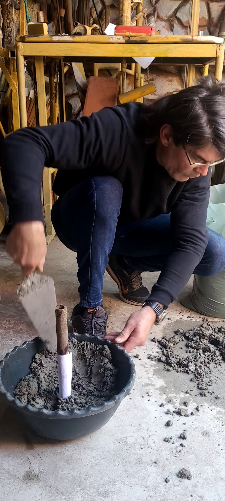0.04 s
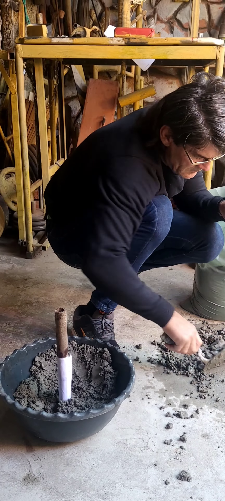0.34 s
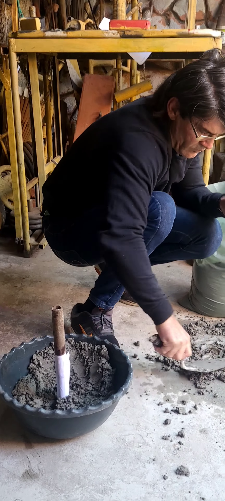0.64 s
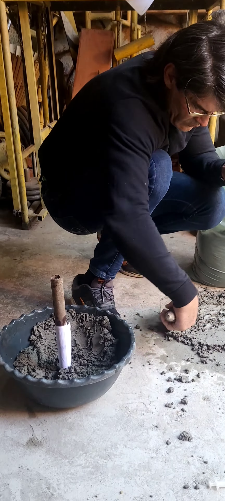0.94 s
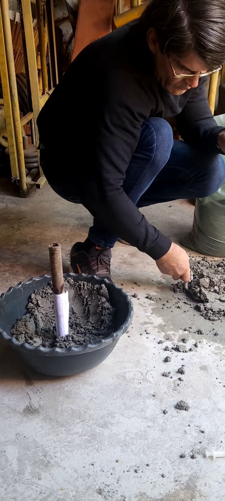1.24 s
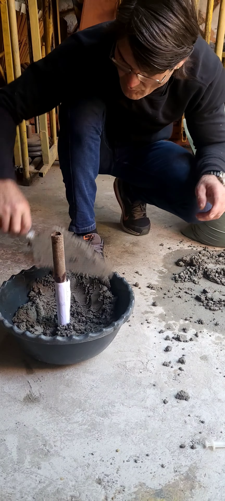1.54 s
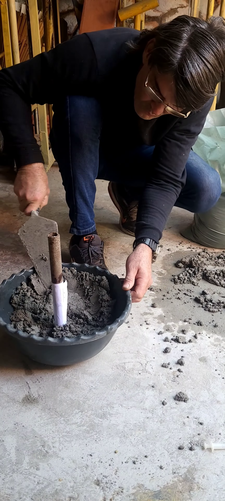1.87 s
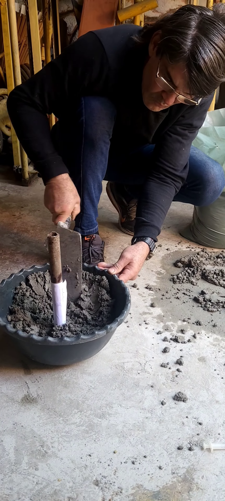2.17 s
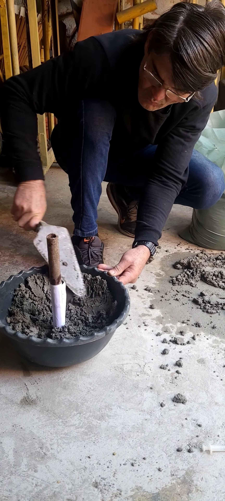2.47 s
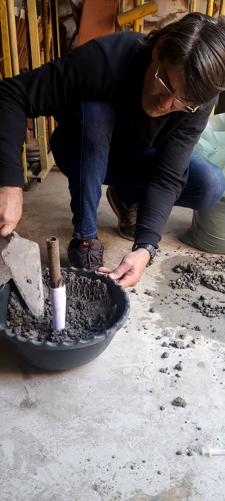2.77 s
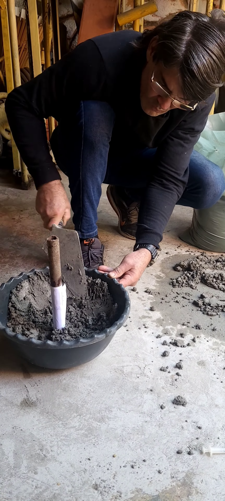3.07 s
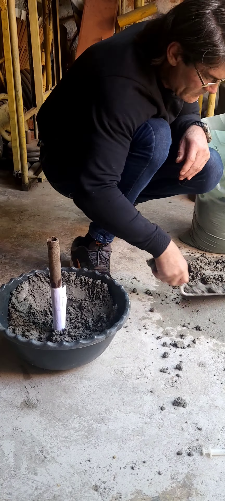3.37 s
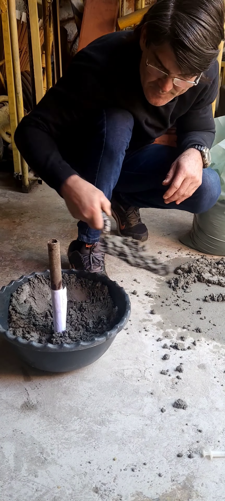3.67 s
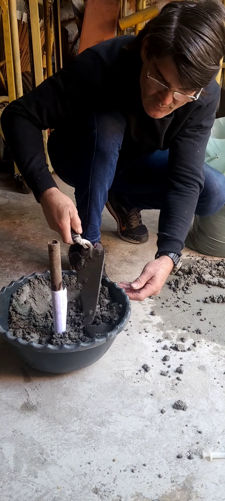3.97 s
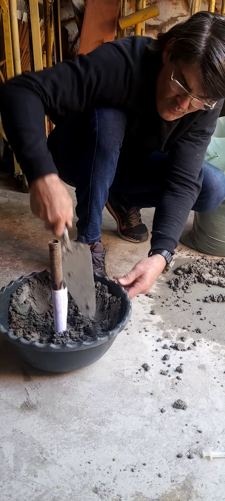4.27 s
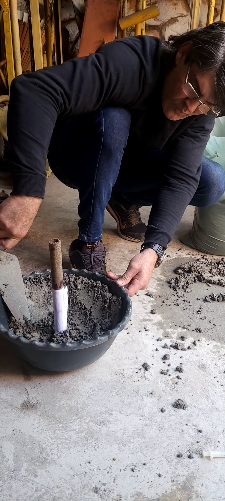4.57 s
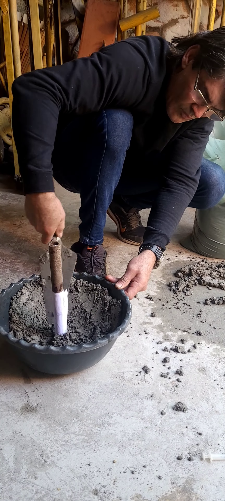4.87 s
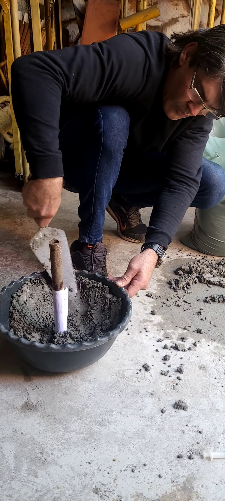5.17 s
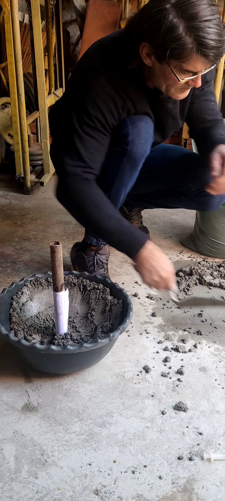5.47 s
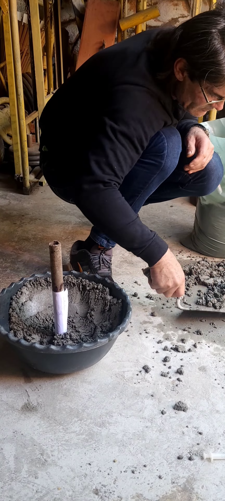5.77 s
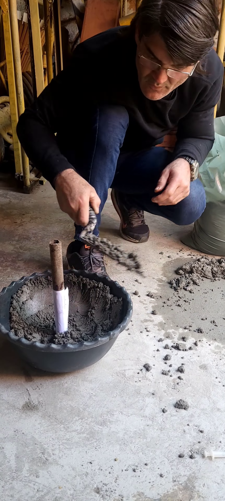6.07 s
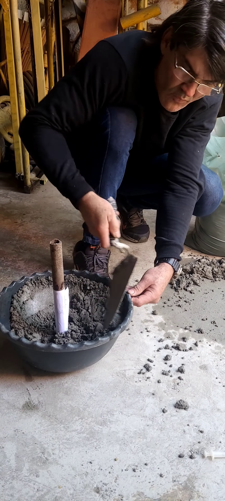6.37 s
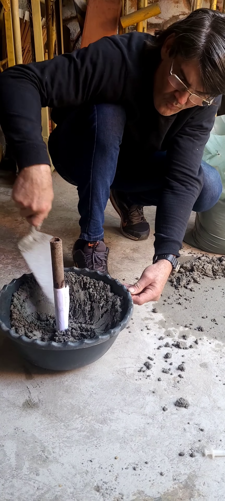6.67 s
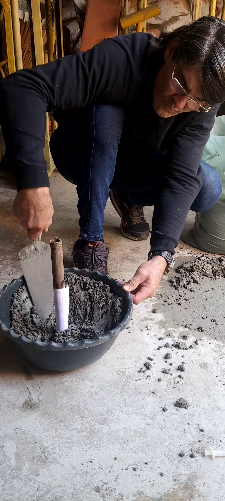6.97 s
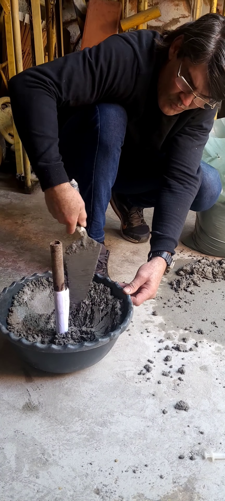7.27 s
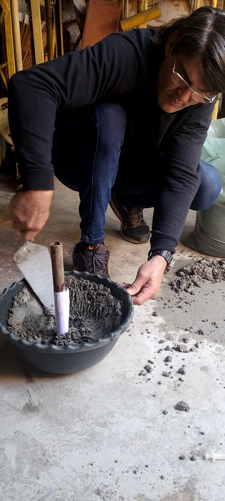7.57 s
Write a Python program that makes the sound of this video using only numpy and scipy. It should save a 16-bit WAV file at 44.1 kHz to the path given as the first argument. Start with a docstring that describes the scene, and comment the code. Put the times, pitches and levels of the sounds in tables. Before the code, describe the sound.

Heard up close in a garage with a low rumble and almost no echo, a metal trowel gathers gritty mortar from the floor. Three short, loud scoops rasp and make the blade ring, the later two with bright clinks. After each one, the trowel smooths and presses the wet mix into a plastic basin with a quiet sandy hiss, crunches and dull taps. A final sharp dig ends it.

```python
"""Garage workshop, a stereo pair close to a steel trowel working wet mortar over a low room rumble.
First the edge rakes the concrete floor: sand grinds under the blade and makes it ring and judder.
A scoop follows at 1.1 s, then the load is packed into a plastic basin: a soft hiss, with dull grinds
and knocks where the tip reaches the plastic. Scooping and packing come round again at 3.2 and 5.7 s.
A faint drone joins near 7 s, and the blade digs into the basin once more at 7.6 s."""
import sys
import numpy as np
from scipy import signal
from scipy.fft import rfft, irfft, next_fast_len
from scipy.io import wavfile
from scipy.ndimage import map_coordinates

SR = 44100
rng = np.random.default_rng(int(sys.argv[2]) if len(sys.argv) > 2 else 0)


def persist_wave(psi):
    """Save psi, clipped to +-1, as 16-bit WAV."""
    counts = np.round(np.clip(psi, -1, 1) * 32767).astype(np.int16)
    wavfile.write(sys.argv[1], SR, np.atleast_2d(counts).T)


N = 340893
TIME = np.arange(N) / SR
BINS = np.fft.rfftfreq(4096, 1 / SR)

# Two spots as the microphones hear them: f/Hz, likeness/0-1, left minus right/dB, left phase lead/rad
AT_TIP = [(60, .97, -5, 0), (250, .96, -1.5, 0), (1000, .66, -3.5, -.28), (2490, .25, -2.5, -.57),
          (4340, .1, -5.3, -.6), (8250, .15, -11.5, -.5), (12000, .6, -10, -.6), (15500, .1, -3.5, -.6)]
AT_BASIN = [(60, 1, -4.5, -.24), (300, .86, -3.5, -.28), (1400, .28, -3, -.36), (2700, .3, -3.5, -.8),
            (4500, .19, -5, -1.2), (8500, .05, -9, -.93), (11000, .05, -12, -1.5), (15500, .05, -6, -1.1)]

# Spectra: f/Hz, relative level/dB
ROOM_AIR = [(30, -25), (110, -5), (170, -3), (250, 0), (410, 1), (500, -9), (800, -15), (1200, -19),
            (2500, -31), (5000, -31), (7300, -32), (8500, -39), (16000, -42)]
ROOM_RUMBLE = [(20, -28), (35, -20), (60, 8.5), (100, -8), (160, -15.5), (400, -37)]
WET_SAND = [(300, -12), (1100, -8), (2800, -6), (3400, -1.5), (4400, 4), (5800, 0), (7100, 3.5),
            (8000, -4.5), (9000, -5), (10800, 1.5), (13000, -0.5), (16000, -4.5)]
COARSE_GRIT = [(700, -15), (2100, -3.5), (3100, -5), (4300, 1), (5900, -1), (7000, 1), (7900, -6.5),
               (9000, -9), (10600, -2.5), (13000, -4.5), (16000, -12)]
HEAP_DRAG = [(20, -36.5), (100, -13.5), (170, -1.5), (255, 4), (340, -3.5), (480, -3.5), (590, 7), (700, 4),
             (860, -1), (1200, -4.5), (2500, -33.5)]
BASIN_WALL = [(90, -23), (270, -7), (400, 0), (560, 2.5), (1000, 1.5), (1400, 2.5), (2300, -5.5),
              (4500, -8.5), (7000, -9), (9000, -36), (16000, -44)]
FALLING_LUMP = [(25, -21.5), (60, -13), (180, -10.5), (350, -18.5), (900, -36), (3000, -78)]

# Blade modes: f/Hz, width/Hz, relative level/dB
BEDDED_BLADE = [(550, 88, -2.5), (1360, 136, -1), (1535, 120, 1.5), (1912, 57, 7), (2033, 27, -3),
                (2508, 86, 0), (3320, 61, 0), (4140, 63, -2)]  # sunk in mortar
FLAT_BLADE = [(975, 100, -7.5), (1197, 18, 1), (1360, 60, -4.5), (1440, 60, -7.5), (1462, 44, -3),
              (1723, 130, -3.5), (1886, 52, 0), (2390, 53, -10), (2580, 30, -6.5), (2870, 26, -14.5),
              (3320, 84, -6.5), (4340, 58, -5)]  # pressed flat
BLADE_ON_EDGE = [(860, 32, -1.5), (1270, 210, 2), (1370, 110, -5.5), (1470, 45, -0.5), (1700, 71, -4),
                 (1875, 56, 2.5), (2040, 120, -6.5), (2490, 63, 4), (2540, 63, -5), (3537, 55, 3.5),
                 (4550, 55, -11), (4830, 75, -1), (5700, 92, -11)]
FREE_BLADE = [(1525, 30, 0), (1945, 35, -1), (2490, 35, -8), (3550, 40, -12), (4020, 45, -11),
              (4330, 45, -11), (4880, 45, -12)]

# Cue sheets; the levels are trimmed on their way to the microphones.
# Course of the rumble: t/s, level/dB
RUMBLE_LEVEL = [(0, -56.5), (1.03, -71), (1.25, -61.5), (1.75, -67), (3, -67.5), (4.9, -71), (6.15, -67),
                (6.45, -63), (7.73, -59.5)]
# Smoothing strokes in the basin: t/s, length/s, hiss/dB, swell/dB, ring/dB
STROKES = [(0.0, 0.032, -51.5, -20, -56), (1.428, 0.14, -58.5, 20, -65), (1.722, 0.086, -54, 5, -65.0),
           (1.824, 0.043, -51.5, -6, -61.0), (1.886, 0.097, -52.5, 3.5, -57),
           (2.054, 0.094, -57.5, -2, -63.5), (2.155, 0.051, -44.0, -2.0, -53.5),
           (2.273, 0.16, -53, 4.5, -56.5), (2.434, 0.125, -59, 5.5, -63), (2.555, 0.07, -48, -4, -53),
           (2.634, 0.04, -50.5, 5.5, -52), (2.736, 0.073, -58, 13.5, -66), (2.863, 0.047, -52, 6, -62),
           (2.946, 0.17, -52.5, -6.0, -60), (3.732, 0.15, -57, -14.5, -61.5),
           (3.964, 0.242, -49, -0.5, -54.5), (4.273, 0.11, -54, -1, -57), (4.382, 0.11, -52, 15, -60.5),
           (4.485, 0.29, -50.5, 1, -58.0), (4.833, 0.14, -50.5, 1.5, -60.5),
           (5.049, 0.082, -54.5, -3.5, -65), (5.139, 0.15, -47.5, 8, -62.5), (5.983, 0.18, -60, 6, -72),
           (6.172, 0.03, -47.5, -0.5, -48), (6.299, 0.13, -48, 6.5, -52), (6.449, 0.19, -48, 0.5, -55),
           (6.679, 0.2, -55, -1, -61), (6.896, 0.25, -52.5, 14.5, -57), (7.167, 0.18, -47.5, -2.5, -55.5),
           (7.406, 0.24, -48.0, 3.5, -52.5)]
# Sharp steel clinks as the edge or tip makes contact, on the floor or in the basin: t/s, peak/dB
CLINKS = [(0.075, -43.5), (0.838, -29.5), (3.31, -16), (3.352, -17), (5.498, -23), (5.7285, -11.5),
          (5.736, -12.5), (5.7991, -15), (6.309, -38.5), (7.104, -25.5), (7.415, -35.5), (7.627, -23)]
# Pushes of the blade through gritty mortar, on the floor and in a last dig in the basin at 7.6 s:
# t/s, length/s, run-out t60/s, hiss/dB, swell/dB, ring/dB, drag/dB
RAKES = [(0.118, 0.022, 0.14, -46, 2.5, -44.5, -47), (0.19, 0.12, 0.092, -36.5, 5, -41.5, -44),
         (0.423, 0.042, 0.24, -50.5, 4.5, -55.0, -62.5), (0.497, 0.081, 0.2, -46.5, 8.5, -54, -61),
         (0.604, 0.015, 0.12, -40.5, 4, -45, -57), (0.653, 0.032, 0.134, -45.5, 2, -57, -63),
         (0.697, 0.07, 0.045, -43, -8.5, -53.5, -77), (0.833, 0.057, 0.042, -35, 1.5, -41, -42.5),
         (0.894, 0.025, 0.12, -39.5, -0.5, -54, -52.5), (5.477, 0.2, 0.073, -37.5, 8, -45, -48)]  # the edge gathers loose mortar
SCOOPS = [(1.092, 0.026, 0.082, -44, -1, -42.5, -53.5), (1.128, 0.087, 0.1, -29, 9, -29.5, -43),
          (3.249, 0.067, 0.085, -41.5, 9.5, -46, -41), (3.305, 0.067, 0.12, -30.5, 5, -28, -42.5),
          (3.394, 0.04, 0.067, -30, -8.5, -30.5, -39), (3.463, 0.016, 0.054, -42.5, 1, -59, -76),
          (5.738, .022, 0.029, -39, 4, -35, -52), (5.759, 0.023, .04, -26, 1.5, -25, -46),
          (5.784, 0.043, 0.064, -23.5, -2, -33.5, -38.5), (7.597, 0.019, 0.063, -33.5, 0, -44, -55),
          (7.62, 0.018, 0.048, -27.5, 2, -36, -46)]  # the blade is shoved into it
# The loaded blade judders, pitched by the point of contact: t/s, length/s, f/Hz, level/dB
JUDDERS = [(.225, .08, 830, -45), (.52, 0.09, 1160, -51.5), (1.152, 0.094, 1104, -32.5),
           (3.325, 0.13, 1177, -35), (5.76, 0.028, 1385, -27.5), (6.457, 0.07, 1420, -51.5),
           (6.833, 0.026, 3480, -48), (7.625, 0.023, 520, -40), (7.619, 0.03, 928, -41)]
# Dull knocks of the trowel: t/s, peak/dB, f/Hz
KNOCKS = [(1.129, -23, 695), (2.5824, -35, 890), (3.82, -43, 1120), (5.497, -28, 1110), (6.3915, -33, 810),
          (6.5168, -16, 1030), (6.522, -27, 900), (6.5392, -16.5, 1290), (6.866, -38, 930),
          (7.101, -25, 1400), (7.128, -26, 1180), (7.266, -39.5, 613)]
# Brief sounds: t/s, length/s, level/dB
TIP_TOUCHES = [(.836, 0.053, -38), (2.79, 0.022, -52.5), (2.872, 0.034, -57), (2.96, .04, -63),
               (3.085, 0.016, -52.5), (3.251, 0.066, -39), (3.306, 0.02, -38.5), (5.484, 0.048, -51),
               (5.729, 0.028, -38), (7.42, 0.06, -50), (7.622, 0.018, -33.5)]  # only the tip touches, so the blade sings
RUSTLES = [(.96, 0.07, -64.5), (1.305, 0.081, -75.5), (1.61, 0.11, -69), (2, 0.042, -61.5),
           (3.16, 0.078, -64), (3.52, .2, -79.5), (5.34, 0.27, -70), (5.89, 0.15, -74), (6.23, .06, -67.5)]  # sleeves, and crumbs sliding on the lifted blade
BUMPS = [(1.51, 0.05, -55), (2.32, 0.066, -53.5), (3.8, 0.053, -61), (5, 0.069, -60), (6.49, .04, -52),
         (6.69, 0.037, -48)]  # the basin shifts on the floor
PLOPS = [(1.53, 0.045, -60), (2.581, 0.015, -53), (3.81, .068, -52.5), (6.39, .06, -58), (6.51, .03, -51),
         (6.72, 0.042, -57), (6.85, .056, -62)]  # mortar falls
CRUNCHES = [(1.535, 0.053, -52.5), (1.655, 0.024, -61), (1.793, 0.024, -52.5), (2.335, 0.064, -55.5),
            (2.58, 0.025, -39), (2.653, 0.021, -46.5), (3.607, 0.0081, -56), (3.68, 0.04, -61),
            (3.812, 0.035, -52), (3.947, 0.045, -58.5), (3.975, 0.028, -43.5), (4.026, 0.014, -42.5),
            (4.488, 0.022, -44.5), (4.536, 0.032, -43.5), (4.603, 0.022, -43), (5.28, 0.027, -43),
            (6.181, 0.025, -38.5), (6.326, 0.083, -43), (6.518, 0.029, -34), (6.72, 0.011, -51.5),
            (6.843, 0.044, -50), (7.064, 0.059, -45), (7.26, 0.026, -57)]  # the tip grinds against the basin
PRESSES = [(1.557, 0.011, -44), (1.954, 0.015, -42), (2.329, 0.017, -40.5), (4.531, 0.013, -43),
           (5.221, 0.02, -43), (6.362, 0.017, -41), (6.414, .016, -41), (6.508, 0.032, -41),
           (6.828, 0.025, -39), (6.945, 0.021, -40.5), (7.096, 0.01, -37.5)]  # a harder press squeezes the wet sand


def amp(db):
    """Decibels to gain."""
    return 10 ** (np.asarray(db) / 20)


def unit_rms(x):
    """Scales to rms 1."""
    return x / np.sqrt(np.mean(x ** 2) + 1e-20)


def columns_at(table, hz=BINS):
    """Columns of a table, joined by straight lines over log frequency."""
    f, *columns = np.transpose(table)
    return [np.interp(np.log(hz + 1), np.log(f), c) for c in columns]


def shape(spectrum):
    """Gain of a spectrum table."""
    return amp(columns_at(spectrum)[0])


def resonances(modes):
    """Gain of a set of damped modes."""
    powers = (amp(2 * db) * (BINS * width) ** 2 / ((BINS ** 2 - hz ** 2) ** 2 + (BINS * width) ** 2)
              for hz, width, db in modes)
    return np.sqrt(sum(powers))


def colour(x, gain):
    """Minimum-phase filter: it rings after each grain, never before."""
    log_gain = np.log(np.maximum(np.r_[gain, gain[-2:0:-1]], 1e-5))
    taps = np.fft.ifft(np.exp(np.conj(signal.hilbert(log_gain)))).real
    return signal.oaconvolve(x, taps[None], axes=1)[:, :x.shape[1]]


def microphones(pair, place):
    """Turns two unrelated signals into left and right, alike in the bass and apart in the treble."""
    size = next_fast_len(pair.shape[1])
    right, unrelated = rfft(pair, size)
    likeness, lean_db, lead = columns_at(place, np.fft.rfftfreq(size, 1 / SR))
    likeness = np.clip(likeness, 0, 1)
    blend = likeness * right + np.sqrt(1 - likeness ** 2) * unrelated
    left = blend * np.exp(1j * lead) * amp(lean_db)
    return irfft(np.array([left, right]), size)[:, :pair.shape[1]]


def voiced(sizes, gain, place):
    """Each grain kicks a body one way or the other; rms 1 midway between the microphones."""
    kicks = sizes * rng.choice([-1, 1], (2, N))
    sound = colour(microphones(kicks, place), gain)
    return sound / np.std(sound.mean(0))


def wander(rate_hz):
    """Smooth random motion of rms 1."""
    return unit_rms(np.interp(TIME * rate_hz, np.arange(N), rng.standard_normal(N)))


def grains(per_s, spread_db, slip_hz, slip_db):
    """Sizes of the sand grains that crack under the steel, in clumps as the blade sticks and slips."""
    sizes = amp(spread_db * np.minimum(rng.exponential(1, N), 4))
    cracks = rng.random(N) < per_s / SR
    return sizes * cracks * amp(slip_db * wander(slip_hz))


def push(start, length, db, swell_db, attack_s, t60):
    """Gain of one push of the hand: the blade bites, the pressure swells or eases, the blade runs out."""
    gain = np.zeros(N)
    first = max(round(start * SR), 0)
    t = TIME[first:first + round((length + 2 * t60) * SR)] - start
    bite = np.clip(t / attack_s, 0, 1)
    held = amp(db + swell_db * (np.clip(t / length, 0, 1) - .5))
    run_out = amp(-60 * np.maximum(t - length, 0) / t60)
    gain[first:first + len(t)] = bite * held * run_out
    return gain


def bursts(cues, rise_s, fall_s):
    """Gain of brief sounds: a quick rise, a sagging hold, a quick fall, silence between."""
    gain = np.zeros(N)
    for start, length, db in cues:
        corners = start + np.array([0, rise_s, max(length - fall_s / 2, rise_s), length + fall_s])
        gain += amp(db) * np.interp(TIME, corners, [0, 1, .7, 0])
    return gain


def add(mix, start, sound):
    """Mixes a sound in at its start time."""
    part = mix[:, round(start * SR):][:, :sound.shape[-1]]
    part += sound[..., :part.shape[1]]


def sliding(x, patchy_db, patch_hz=240, patch_s=.035):
    """The contact moves along the blade, so its many high modes swell and fade in turn."""
    hz, t, spectra = signal.stft(x, SR, nperseg=512, noverlap=384)
    grid = np.meshgrid(hz / patch_hz, t / patch_s, indexing="ij")
    patches = unit_rms(map_coordinates(rng.standard_normal((128, 512)), grid, order=1, mode="wrap"))
    depth_db = patchy_db * np.interp(hz, [5000, 9000], [1, .55])  # the highest modes overlap and even out
    spectra *= amp(depth_db[:, None] * patches)
    moved = signal.istft(spectra, SR, nperseg=512, noverlap=384)[1][:, :N]
    return moved / np.std(moved.mean(0))


def room_tone(air_db=-63, waver_db=1, drone_hz=156, drone_db=-66, drone_start_s=6.85):
    """Steady workshop air and a restless rumble with the basin's bumps; a faint drone joins late."""
    steady = np.ones(N)
    air = amp(air_db) * voiced(steady, shape(ROOM_AIR), AT_BASIN)
    restless = amp(np.interp(TIME, *np.transpose(RUMBLE_LEVEL)) + waver_db * wander(rate_hz=11))
    bumps = bursts(BUMPS, rise_s=0.025, fall_s=.03)
    rumble = voiced(steady, shape(ROOM_RUMBLE), AT_BASIN) * np.hypot(restless, bumps)
    drone = voiced(steady, resonances([(drone_hz, 14, 0)]) ** 2, AT_BASIN)
    fade_in = np.clip((TIME - drone_start_s) / 0.14, 0, 1)
    return air + rumble + amp(drone_db) * drone * fade_in


def smoothing(hiss_trim_db=-0.44, ring_trim_db=-1.5, lift_t60=0.066):
    """In the basin the blade hisses over wet sand, its ring damped by mortar; sleeves rustle between."""
    hiss, ring = np.zeros((2, N))
    for start, length, hiss_db, swell_db, ring_db in STROKES:
        pressure = push(start, length, 0, swell_db, attack_s=0.023, t60=lift_t60)
        hiss += amp(hiss_db + hiss_trim_db) * pressure
        ring += amp(ring_db + ring_trim_db) * pressure
    squeeze = sum(push(start, length, db + hiss_trim_db, 0, attack_s=0.0084, t60=lift_t60)
                  for start, length, db in PRESSES)
    unsteady_hand = amp(1.35 * wander(rate_hz=40))
    hiss = np.hypot(unsteady_hand * hiss, squeeze) + bursts(RUSTLES, rise_s=0.017, fall_s=.02)
    sand = grains(per_s=12000, spread_db=1.5, slip_hz=150, slip_db=1.57)
    return (hiss * sliding(voiced(sand, shape(WET_SAND), AT_BASIN), patchy_db=2.6)
            + unsteady_hand * ring * voiced(sand, resonances(BEDDED_BLADE), AT_BASIN))


def clinks(crack_t60=0.022, ring_db=5, trim_db=1):
    """The edge or tip makes contact: a burst of crushed grit sets the blade ringing."""
    out, t = np.zeros((2, N)), TIME[:SR // 8]
    steel = shape(COARSE_GRIT) + amp(ring_db) * resonances(FLAT_BLADE)
    for start, db in CLINKS:
        crack = microphones(rng.standard_normal((2, len(t))), AT_TIP) * amp(-60 * t / crack_t60)
        hit = colour(crack, steel)
        add(out, start, amp(db + trim_db) * hit / abs(hit.mean(0)).max())
    return out


def scrapes(cues, modes, attack_s, hiss_trim_db, ring_trim_db, drag_trim_db):
    """Coarse sand under the steel hisses and rings the blade as it drags through the mortar."""
    hiss, ring, drag = np.zeros((3, N))
    for start, length, t60, hiss_db, swell_db, ring_db, drag_db in cues:
        pressure = push(start, length, 0, swell_db, attack_s, t60)
        hiss += amp(hiss_db + hiss_trim_db) * pressure
        ring += amp(ring_db + ring_trim_db) * pressure
        drag += amp(drag_db + drag_trim_db) * pressure
    sand = grains(per_s=8000, spread_db=0, slip_hz=260, slip_db=1.4)
    return (hiss * sliding(voiced(sand, shape(COARSE_GRIT), AT_TIP), patchy_db=4.5)
            + ring * voiced(sand, resonances(modes), AT_TIP)
            + drag * voiced(sand, shape(HEAP_DRAG), AT_TIP))


def judders(width_hz=130):
    """Stick and slip pumps one bending mode of the blade for a moment."""
    out = np.zeros((2, N))
    for start, length, hz, db in JUDDERS:
        slips = microphones(rng.standard_normal((2, SR // 4)), AT_TIP)
        rasp = colour(slips, resonances([(hz, width_hz, 0)]) ** 2)[:, -round(length * SR):]
        rasp /= np.std(rasp.mean(0))
        add(out, start, amp(db) * rasp * signal.windows.tukey(rasp.shape[1]))
    return out


def singing(trim_db=1):
    """Light contact bows the modes of the free blade: clear lines with dark gaps between."""
    lines = resonances(FREE_BLADE) ** 1.4
    contact = bursts(TIP_TOUCHES, rise_s=0.004, fall_s=0.016)
    return amp(trim_db) * contact * voiced(np.ones(N), lines, AT_TIP)


def knocks(rise_cycles=0.58, left_db=-2, right_db=-6.5):
    """Trowel knocks, louder on the left microphone; mortar deadens each within two or three cycles."""
    out, t = np.zeros((2, N)), TIME[:SR // 20]
    for start, db, hz in KNOCKS:
        age = t * hz / rise_cycles
        add(out, start, amp(db) * age * np.exp(1 - age) * np.sin(2 * np.pi * hz * t))
    return out * amp([[left_db], [right_db]])


def packing(crunch_trim_db=0.5):
    """Grit crushed against the plastic wall, and the soft thud of falling lumps."""
    sand = grains(per_s=3000, spread_db=0.5, slip_hz=140, slip_db=0.5)
    crunch = bursts(CRUNCHES, rise_s=0.0047, fall_s=0.017) * voiced(sand, shape(BASIN_WALL), AT_TIP)
    plop = bursts(PLOPS, rise_s=0.0069, fall_s=0.022) * voiced(sand, shape(FALLING_LUMP), AT_TIP)
    return amp(crunch_trim_db) * crunch + plop


def garage_echo(x, t60=0.14, gap_s=0.019, level_db=-31):
    """The cluttered room answers with a short tail, weak this close to the trowel."""
    t = TIME[:SR // 2]
    tail = rng.standard_normal((2, len(t))) * amp(-60 * t / t60) * (t > gap_s)
    return amp(level_db) * signal.oaconvolve(x, tail / np.linalg.norm(tail[0]), axes=1)[:, :N]


def scene():
    """At the microphones: the trowel up close, its echo and the room tone behind."""
    raking = scrapes(RAKES, BLADE_ON_EDGE, attack_s=0.017,
                     hiss_trim_db=0.5, ring_trim_db=1, drag_trim_db=1.5)
    scooping = scrapes(SCOOPS, FLAT_BLADE, attack_s=0.011,
                       hiss_trim_db=0.57, ring_trim_db=-1.5, drag_trim_db=-0.5)
    trowel = raking + scooping + judders() + smoothing() + singing() + packing() + knocks() + clinks()
    return trowel + garage_echo(trowel) + room_tone()


def record(dry):
    """The recorder's band limit: a steep low-pass on both channels."""
    lowpass = signal.firwin(511, cutoff=16050, window=("kaiser", 9), fs=SR)
    return signal.oaconvolve(dry, lowpass[None], "same")


dry = scene()
out = record(dry)
persist_wave(out)
```